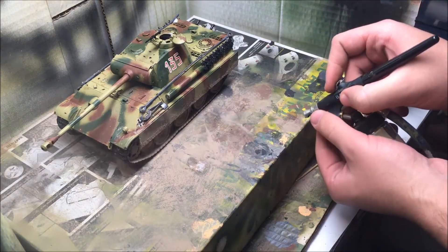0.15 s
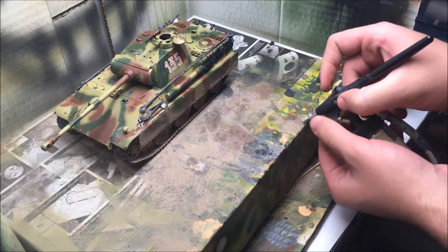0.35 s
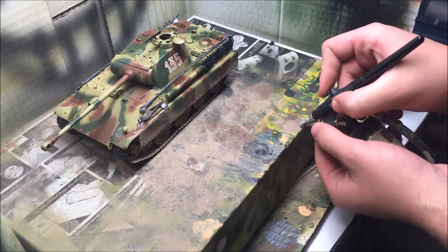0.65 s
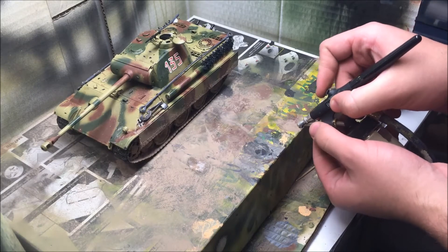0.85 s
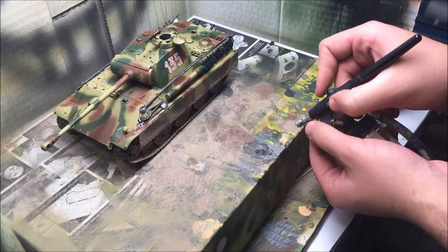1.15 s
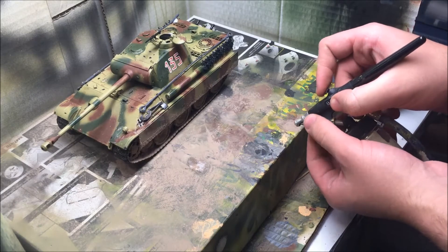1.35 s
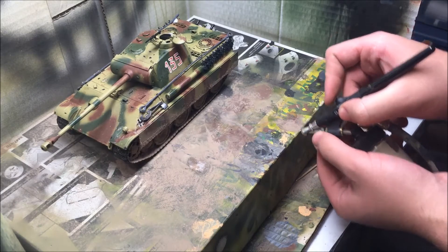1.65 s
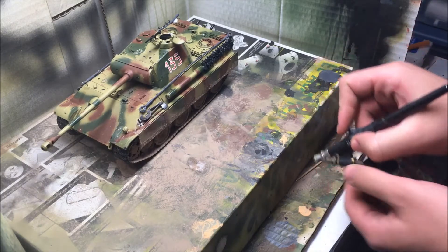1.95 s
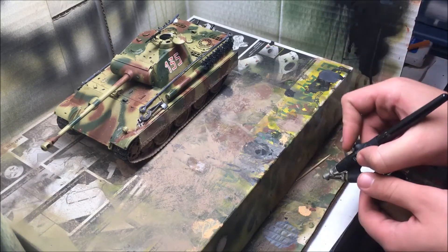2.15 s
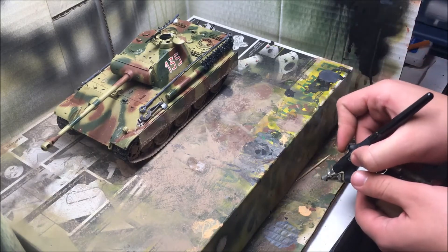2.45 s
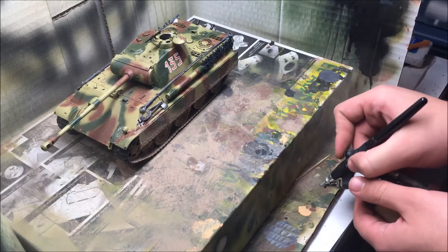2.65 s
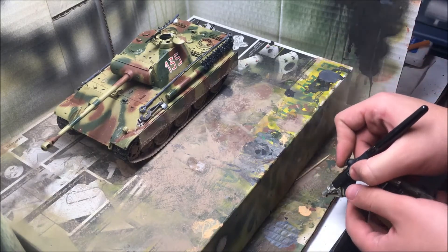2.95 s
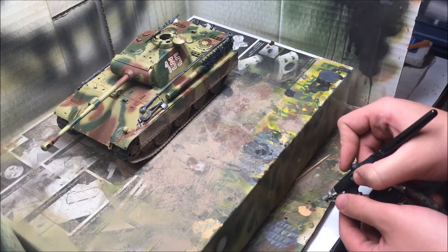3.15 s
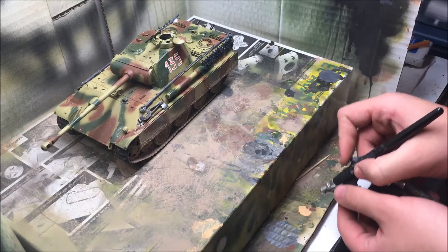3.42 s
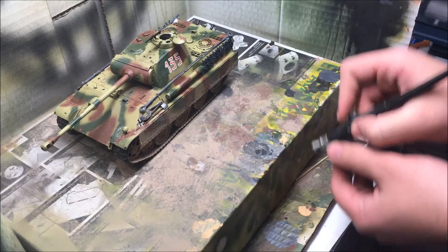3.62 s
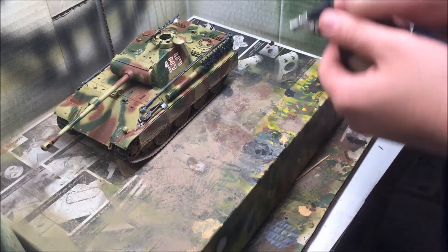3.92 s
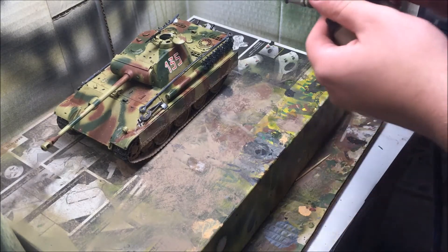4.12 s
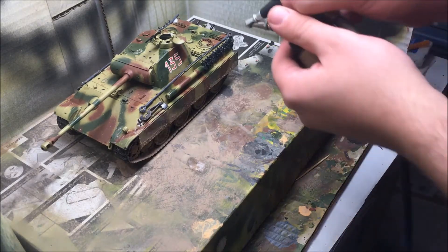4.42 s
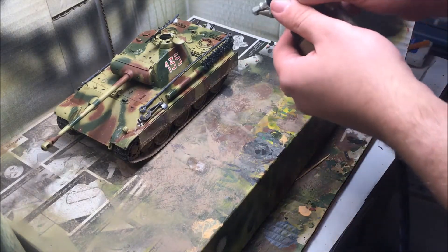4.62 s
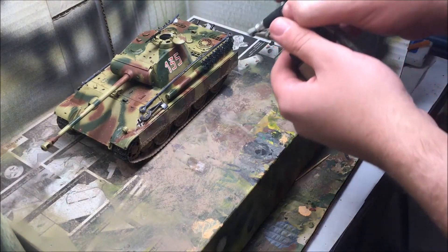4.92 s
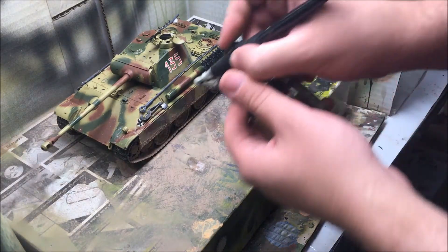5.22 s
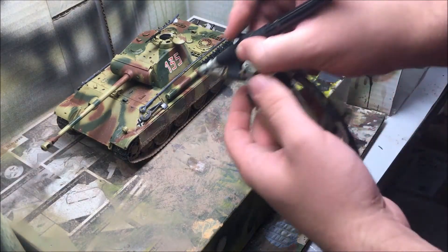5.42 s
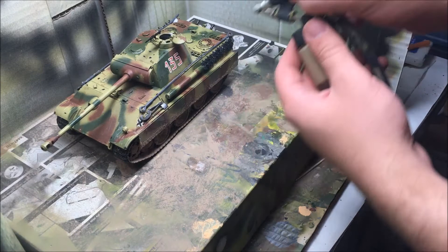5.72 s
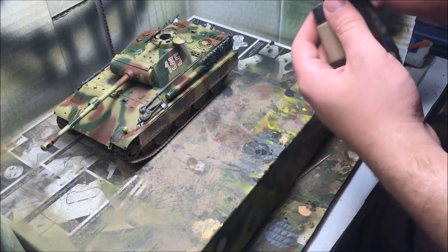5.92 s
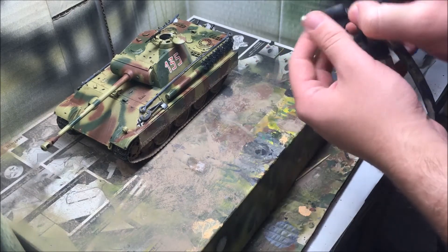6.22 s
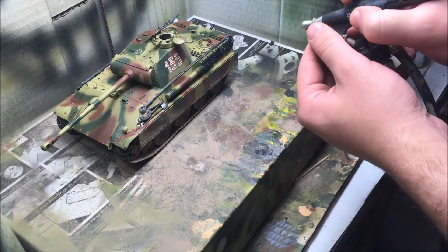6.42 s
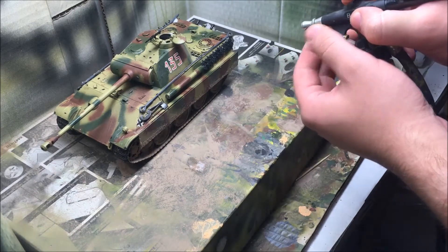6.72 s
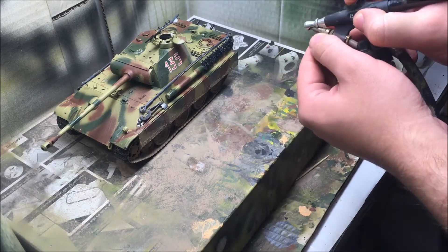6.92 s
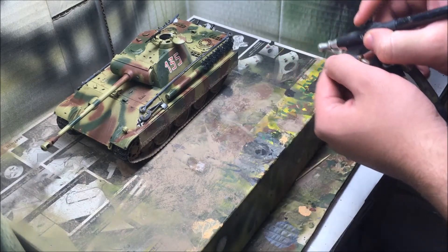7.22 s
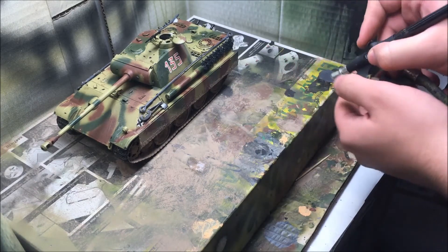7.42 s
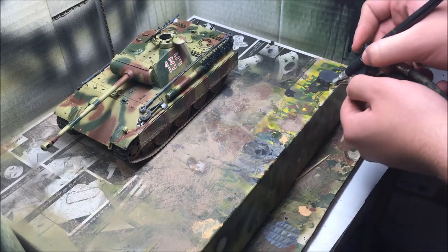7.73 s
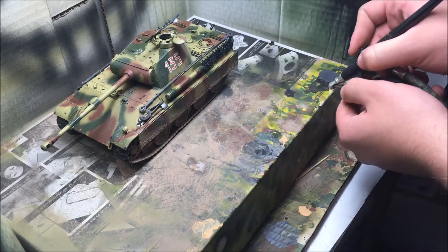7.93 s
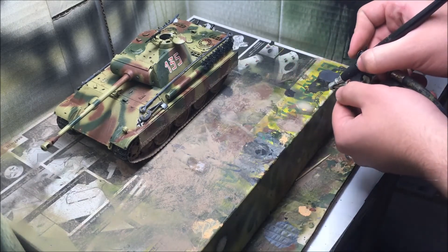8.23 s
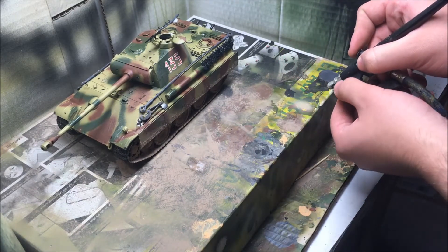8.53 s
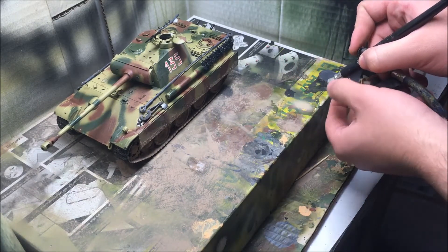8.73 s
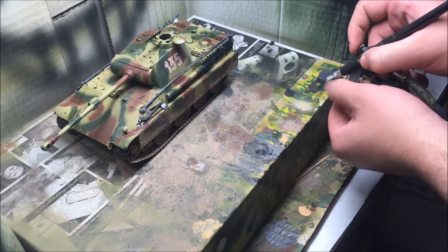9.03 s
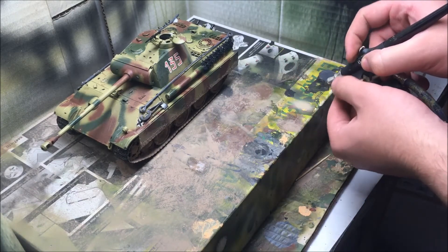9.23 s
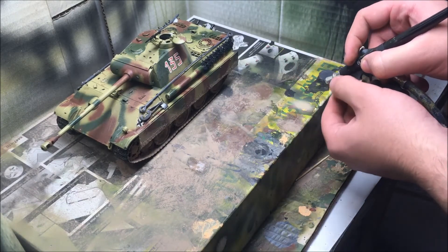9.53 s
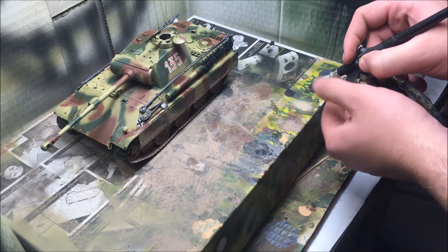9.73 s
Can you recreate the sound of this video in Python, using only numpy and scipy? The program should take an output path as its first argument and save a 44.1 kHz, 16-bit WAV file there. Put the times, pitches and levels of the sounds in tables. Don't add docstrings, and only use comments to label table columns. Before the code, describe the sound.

A small piston compressor hums and rattles steadily while an airbrush lets out two short hisses, then three longer sharp blasts of air, close up.

```python
import sys
import numpy as np
from scipy import signal
from scipy.io import wavfile
from scipy.ndimage import uniform_filter1d, minimum_filter1d

SR = 44100
rng = np.random.default_rng(int(sys.argv[2]) if len(sys.argv) > 2 else 0)


def to_wav(s):
    ch = np.atleast_2d(s).T
    pcm = np.round(np.clip(ch, -1, 1) * 32767)
    wavfile.write(sys.argv[1], SR, pcm.astype(np.int16))


def attenuation_scalar(level_db):
    decades = np.asarray(level_db, float) / 20
    return 10 ** decades


N = 434826
TIME = np.arange(N) / SR

# [shaft order, multiple of twice the mains, level/dB rms]
SHAFT_LINES = [(1, 0, -67), (2, 0, -52), (3, 0, -44), (4, 0, -65), (5, 0, -44), (6, 0, -51), (7, 0, -49),
               (8, 0, -61), (9, 0, -62), (10, 0, -56), (11, 0, -56.5), (12, 0, -68), (13, 0, -62),
               (14, 0, -60), (15, 0, -65), (16, 0, -73), (17, 0, -67), (18, 0, -68), (19, 0, -71),
               (21, 0, -73), (22, 0, -72), (24, 0, -73), (31, 0, -60), (48, 0, -59), (62, 0, -61),
               (68, 0, -60), (97, 0, -65)]
# [shaft order, multiple of twice the mains, level/dB rms]
PULL_LINES = [(-1, 1, -57), (0, 1, -59), (1, 1, -49), (2, 1, -56), (3, 1, -65), (-2, 2, -68), (25, 1, -63),
              (24, 2, -58)]
# [f/Hz, width/Hz, level/dB rms, first blow/turn, second blow/turn, rattle share 0-1]
CASING_MODES = [(939, 136, -51, 0, .76, 0.44), (1001, 62, -56, .05, .22, 0),
                (1288, 34, -50.5, .68, .93, 0.05), (1370, 23, -52.5, .69, .1, 0.1),
                (1762, 29, -53, 0.01, 0.5, 0.63), (1961, 39, -53.5, .7, .12, 0.4),
                (2760, 84, -69, 0.9, 0.9, 0.4), (3964, 77, -59, .07, .1, 0.36),
                (4320, 250, -64.5, 0.03, 0.7, 0.64), (5240, 210, -60, 0.4, 0.6, 0.94),
                (5600, 150, -62, 0.2, 1, 0.4), (6340, 330, -58.5, .66, 0.4, 1),
                (6970, 180, -62.5, .66, .8, 0.88)]
# [t/s, position -1 to 1]
ARM_SHADE = [(0, -.3), (.7, -0.087), (1.4, -0.46), (1.9, 0.78), (2.5, 1), (3.4, 1), (3.8, .3), (4.1, 0.37),
             (5, -0.14), (6.4, 0.15), (7.2, 0.42), (7.9, .1), (8.9, -0.067), (9.86, 0.37)]
# [level at rest/dB, change per arm shade/dB, change with the line drained/dB]
CASING_FACES = [
    (-1.5, -2.5, 1),
    (0.5, 3, 0.7),
    (.5, -3.5, .3),
    (3, 3.2, -12.5),
    (1.5, 0.6, -2),
]
# [f/Hz, level/dB per Hz]
ROOM_SPECTRUM = [(25, -28), (45, -22), (150, -10), (260, -14.5), (420, -26.5), (700, -22.5), (1500, -20.5),
                 (2100, -19), (2500, -26.5), (4300, -22), (4850, -28.5), (7500, -30), (8500, -32),
                 (16000, -26.5)]
# [valve opens t/s, valve shuts t/s, jet level/dB, opening time/s, splash below the jet/dB]
BURSTS = [
    (.8, 0.958, -26.5, 0.034, -25),
    (1.132, 1.283, -25.5, 0.022, -25),
    (2.624, 3.458, -26, 0.044, -20.5),
    (4.132, 6.128, -26.5, .012, -24),
    (7.9, 8.83, -24.5, .02, -25),
]
# [f/Hz, level/dB per Hz]
JET_SPECTRUM = [(1290, -54), (2200, -26), (2860, -26), (3160, -24.5), (4770, -20.5), (5900, -16.5),
                (7800, -15), (9670, -4), (10600, -5.5), (14100, 3), (15100, 5), (15700, -16)]
# [t/s, aim level/dB]
NOZZLE_AIM = [(.8, 0), (.96, 0.5), (1.13, 0), (1.28, 1), (2.62, -0.5), (2.9, 1), (3.18, -1), (3.3, -1),
              (3.45, 0.5), (4.13, -1), (4.35, -0.5), (4.7, 0), (5.2, .5), (5.65, 0.5), (5.95, -0.5),
              (6.13, -1.5), (7.9, -1), (8.83, -1)]
# [level below the top/dB, change per dB of aim/dB]
LOWER_LAYERS = [
    (-12.5, -1),
    (-21.5, -.4),
    (-2, 0.9),
]
# [t/s, speed 0-1]
HAND_SPEED = [(.8, 0.12), (2.6, 0.08), (3.45, 0.07), (4.1, 0.6), (6.1, .45), (7.9, 0.06), (8.85, 0.2)]
# [from t/s, to t/s, f/Hz, width/Hz, level/dB]
BAND_TINTS = [(0.74, 1.4, 10400, 800, 3.5), (0.74, 1.4, 6400, 648.1, 5), (2.698, 3.06, 8600, 2310, -3),
              (2.6, 3.1, 14000, 1500, 1), (2.676, 2.848, 1500, 350, 5), (2.7, 3.2, 1040, 300, 5),
              (2.91, 3.46, 6095, 463, 5), (4.2, 5.0, 756, 320, 6.5), (4.15, 4.55, 12900, 700, 5.5),
              (5.2, 5.9, 15000, 1800, 2.5), (5.25, 5.65, 5960, 540, 6.5), (5.76, 6.2, 13400, 799, 4),
              (6.6, 10, 14590, 500, 3.5), (8.14, 8.9, 10000, 900, 4.5), (7.89, 8.9, 4450, 314.8, 2),
              (7.85, 8, 9200, 399.7, -5)]
# [f/Hz, width/Hz, level/dB]
FIXED_NOTCH = (10500, 400, -3)

START_TURN, FREE_HZ, SAG_HZ = .049, 28.558, .4761
MAINS_PULL_HZ, SLIP_PHASE = 120.01, 1.36
SAG_S, LAG_S, RECOVER_S, REFILL_S = .1717, .1241, .1833, 0.43
EARLIER_SHUT_S = -.1305
UPPER_LOAD_DB = -4
ROOM_DB = -47.5
SETTLE_DB, SETTLE_S, CLOSING_S = -0.5, 0.21, 0.015


def evened(x):
    return x / np.sqrt(np.mean(x ** 2) + 1e-20)


def read(points, hz):
    f, value = np.transpose(points)
    return np.interp(np.log(hz + 1), np.log(f + 1), value)


def patches(shape, frames, bins):
    z = rng.standard_normal(shape[::-1]).T
    over_time = uniform_filter1d(z, frames, 1)
    return evened(uniform_filter1d(over_time, bins, 0))


def noise(magnitude):
    a, b = rng.standard_normal(magnitude.shape[::-1] + (2,)).T
    return signal.istft((a + 1j * b) * magnitude, nperseg=512, noverlap=384)[1][:N]


def ring(x, hz, width):
    r = np.exp(-np.pi * width / SR)
    return signal.lfilter([1, 0, -1], [1, -2 * r * np.cos(2 * np.pi * hz / SR), r * r], x)


def motor_load(recover_s=RECOVER_S):
    def rise(start, pace):
        return 1 - np.exp(-np.maximum(TIME - start, 0) / pace)

    drawn = sum(rise(row[0], SAG_S) - rise(row[1] + LAG_S, recover_s) for row in BURSTS)
    left_over = 1 - rise(EARLIER_SHUT_S + LAG_S, recover_s)
    return np.minimum(left_over + drawn, 1)


def motor_hum(turns):
    turns, t = turns[::4], TIME[::4]
    load = motor_load()
    upper = attenuation_scalar(UPPER_LOAD_DB * load[::4])
    out = 0
    for order, pull, db in SHAFT_LINES + PULL_LINES:
        k = order + 4 * pull
        lead = np.pi / 2 * (k % 2)
        stroke = lead + .05 * k * k + 1.12 * k - 2.55
        angle = 2 * np.pi * (order * turns + pull * MAINS_PULL_HZ * t) + pull * SLIP_PHASE + stroke
        tone = attenuation_scalar(db) * np.sqrt(2) * np.cos(angle)
        out = out + tone * (upper if k > 11 else 1)
    shaking_db = 0.09 + 0.57 * load
    return attenuation_scalar(shaking_db) * signal.resample_poly(out, 4, 1)[:N]


def casing_knocks(turns):
    out = np.zeros(N)
    jostle = rng.standard_normal(N)
    arm, drained = np.interp(TIME, *np.transpose(ARM_SHADE)), motor_load(REFILL_S)
    faces = [attenuation_scalar(rest_db + arm_db * arm + load_db * drained) for rest_db, arm_db, load_db in CASING_FACES]
    for hz, width, db, first, second, rattle in CASING_MODES:
        blows, shake = np.zeros(N), .3
        for angle, force in ((first, 1), (second, .7)):
            at = np.flatnonzero(np.diff(np.floor(turns - angle)))
            blows[at] += force * attenuation_scalar(0.71 * rng.standard_normal(300)[:len(at)])
            shake = shake + force * np.exp(-((turns - angle) % 1) / .14)
        clean = evened(ring(blows, hz, width))
        loose = evened(ring(shake * jostle, hz, width))
        shade = faces[np.searchsorted([1100, 1500, 2300, 4200], hz)]
        out += attenuation_scalar(db) * shade * (np.sqrt(1 - rattle) * clean + np.sqrt(rattle) * loose)
    return out


def room_wash(turns):
    hz, frames = np.fft.rfftfreq(512, 1 / SR), N // 128 + 5
    drift_db = .8 * patches((257, frames), 20, 6)
    wash = noise(attenuation_scalar(read(ROOM_SPECTRUM, hz)[:, None] + drift_db))
    breath_db = 0.35 * np.cos(4 * np.pi * (turns - .15))
    return attenuation_scalar(ROOM_DB + breath_db) * evened(wash)


def valve_opening():
    valve = np.zeros(N)
    for start, end, db, opening, _ in BURSTS:
        since = abs(TIME - start)
        rise = np.clip(1 + (TIME - start) / opening, 0, 1) ** 3
        surge_db = 1.2 * np.exp(-since / 0.018) + SETTLE_DB * np.exp(-since / SETTLE_S)
        fall = attenuation_scalar(db - 20 * np.maximum(TIME - end, 0) / CLOSING_S)
        valve = np.maximum(valve, rise * attenuation_scalar(surge_db) * fall)
    return valve


def surroundings(hz, t):
    speed = np.interp(t, *np.transpose(HAND_SPEED))
    travel = np.cumsum(speed) * 128 / SR
    t, speed, travel = t[::4], speed[::4], travel[::4]
    path, tint_db = 1, 0
    for place, pace, phase in rng.random((10, 3)):
        slide = np.sin(2 * np.pi * ((0.793 + 1.5 * pace) * travel + phase))
        delay = 0.000305 + .003 * place + .00012 * slide
        strength = (0.12 + 0.22 * speed) * np.minimum(hz / 8000, 1)
        path = path + strength * np.exp(2j * np.pi * hz * delay)
    for start, end, centre_hz, width, db in BAND_TINTS + [(0, 10, *FIXED_NOTCH)]:
        held = np.clip(np.minimum(t - start, end - t) / 0.062 + .5, 0, 1)
        tint_db = tint_db + db * held * np.exp(-2 * ((hz - centre_hz) / width) ** 2)
    return np.repeat(abs(path) * attenuation_scalar(tint_db), 4, axis=1)


def airbrush():
    hz, frames = np.fft.rfftfreq(512, 1 / SR)[:, None], N // 128 + 5
    t = np.arange(frames) * 128 / SR
    aim_db = np.interp(t, *np.transpose(NOZZLE_AIM))
    layers_db = [0 * t] + [db + lean * aim_db for db, lean in LOWER_LAYERS]
    for start, end, _, _, splash_db in BURSTS:
        near = abs(t - (start + end) / 2) < (end - start) / 2 + .08
        layers_db[-1] = layers_db[-1] + splash_db * near
    colour = attenuation_scalar(read(JET_SPECTRUM, np.clip(hz, 2300, 15000)))
    edges = [(9000, 17000), (4500, 9000), (2000, 4500), (850, 1900)]  # Hz, thin top first
    power = np.zeros((257, frames))
    for (lo, hi), db in zip(edges, layers_db):
        band = colour / (1 + (lo / (hz + 1)) ** 14) / (1 + (hz / hi) ** 14)
        power += band ** 2 / np.sum(band ** 2) * attenuation_scalar(db) ** 2
    power += attenuation_scalar(-75) / (1 + (hz / 850) ** 6) / (1 + (170 / (hz + 1)) ** 4)
    flicker = attenuation_scalar(0.22 * patches(power.shape, 4, 60))
    jet = noise(np.sqrt(power) * surroundings(hz, t)[:, :frames] * flicker)
    spurts_db = 1.1 * evened(uniform_filter1d(rng.standard_normal(N), 60))
    direct = evened(jet) * attenuation_scalar(np.interp(TIME, t, aim_db) + spurts_db + 6.0) * valve_opening()
    tail = rng.standard_normal(6000) * attenuation_scalar(-60 * TIME[:6000] / 0.15)
    return direct + attenuation_scalar(-19.5) * signal.oaconvolve(direct, tail / np.linalg.norm(tail))[:N]


def scene():
    turns = START_TURN + np.cumsum(FREE_HZ - SAG_HZ * motor_load()) / SR
    mix = motor_hum(turns) + casing_knocks(turns) + room_wash(turns) + airbrush()
    return np.tile(mix, (2, 1))


def top_cut(x):
    return signal.sosfilt(signal.butter(12, 16990, fs=SR, output="sos"), x)


def record(dry):
    power_db = 10 * np.log10(abs(uniform_filter1d(dry[0] ** 2, 3000)) + 1e-12)
    over_db = np.clip(power_db + 30.5, 0, 9.0)
    over_db[:round(.02 * SR)] = 7.5
    hold = round(.09 * SR)
    held_db = -minimum_filter1d(-over_db, hold, origin=(hold - 1) // 2, mode="nearest")
    duck_db = .45 * uniform_filter1d(held_db, 5000, origin=2400, mode="nearest")
    top_edge = signal.firwin(1023, 15770, window=("kaiser", 9), fs=SR)
    mix = signal.oaconvolve(dry / attenuation_scalar(duck_db), top_edge[None], "same")
    return top_cut(mix)


dry = scene()
out = record(dry)
to_wav(out)
```